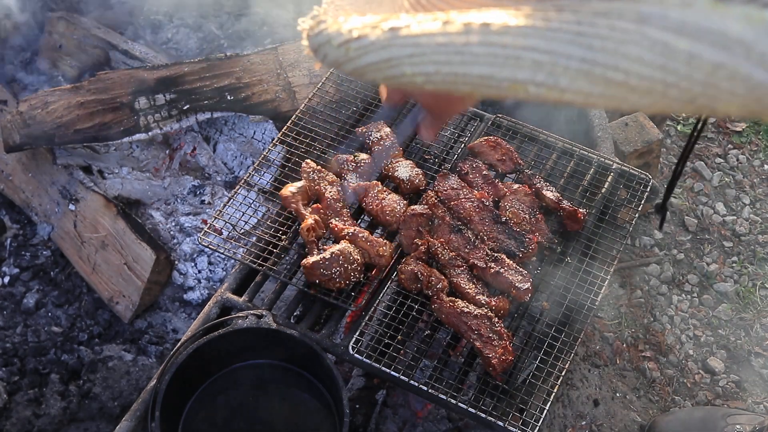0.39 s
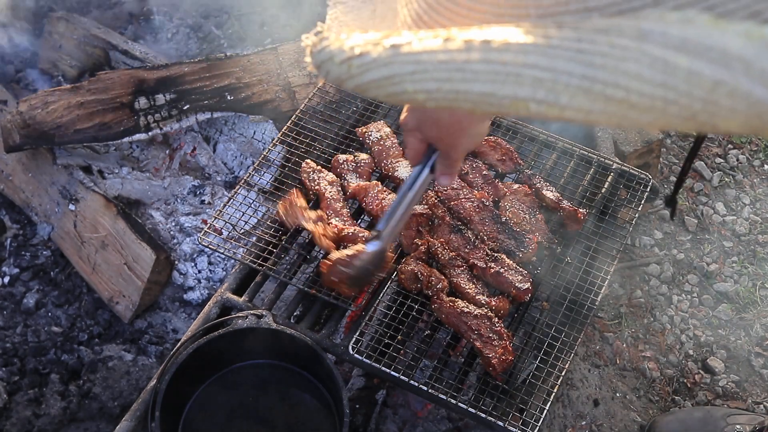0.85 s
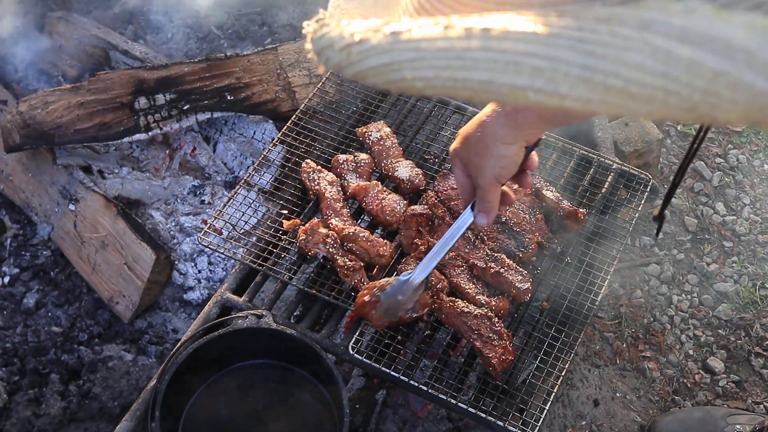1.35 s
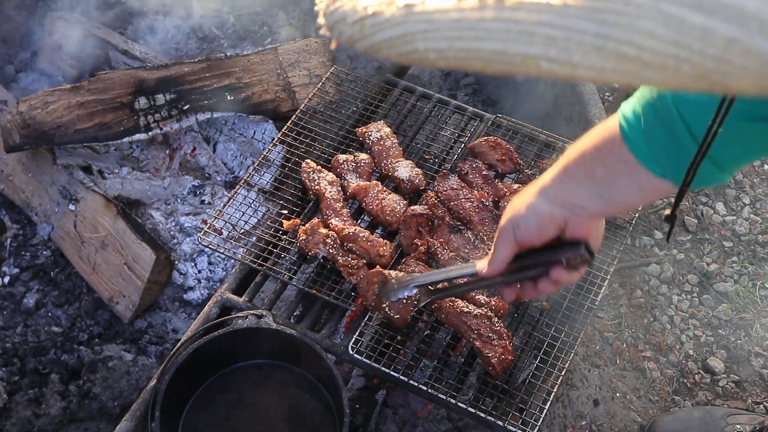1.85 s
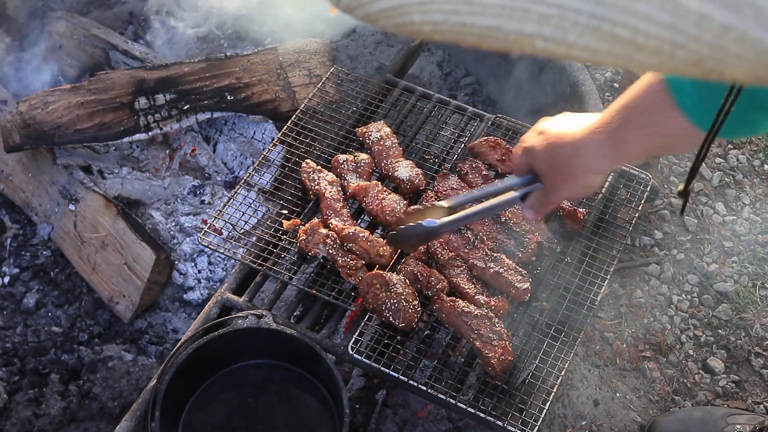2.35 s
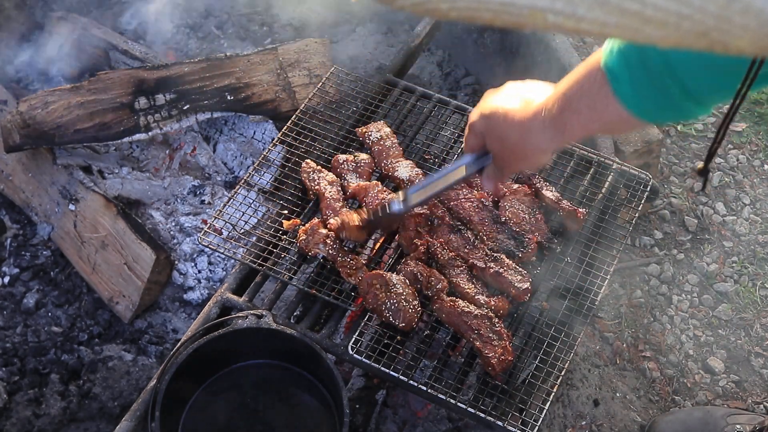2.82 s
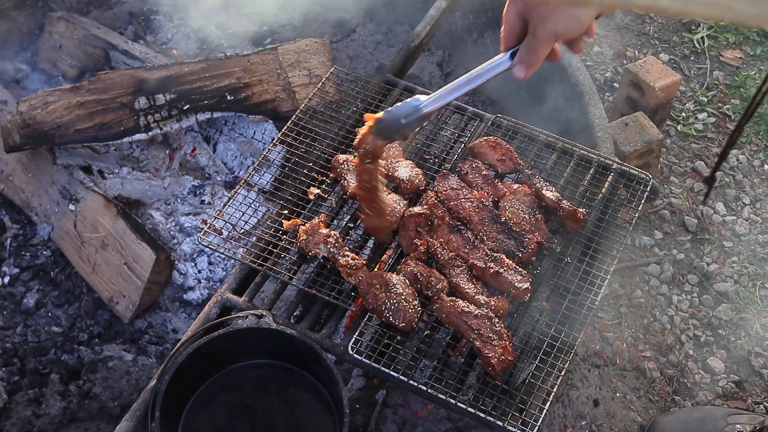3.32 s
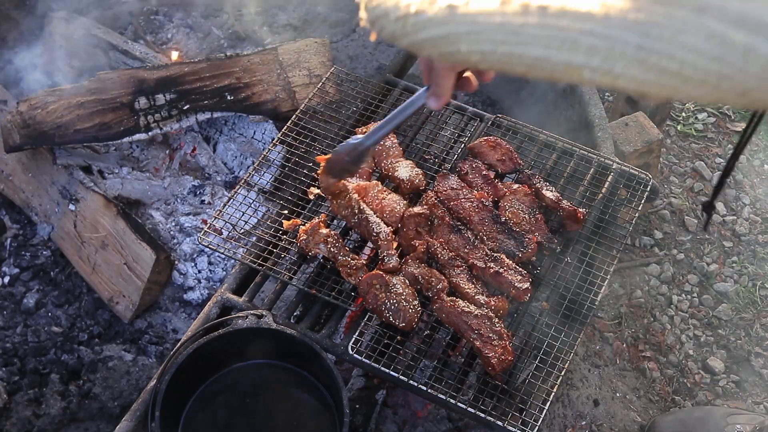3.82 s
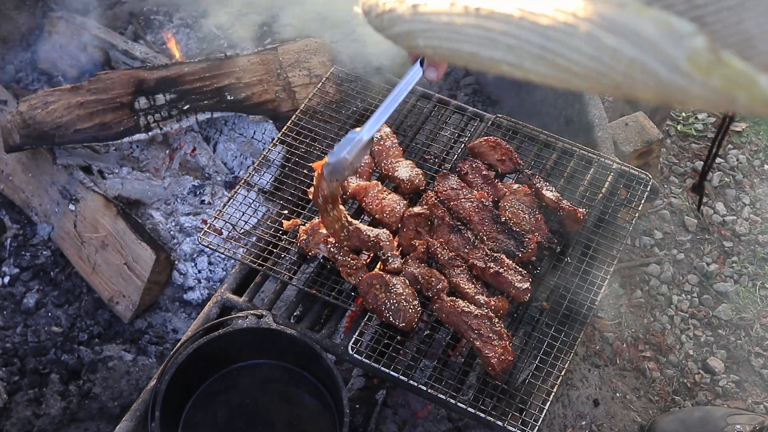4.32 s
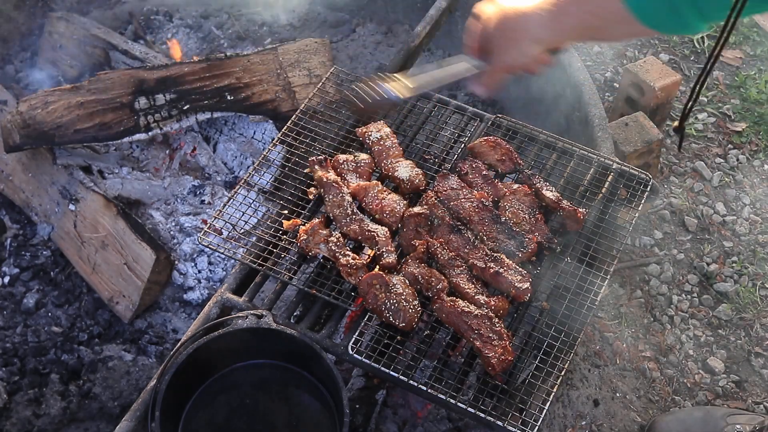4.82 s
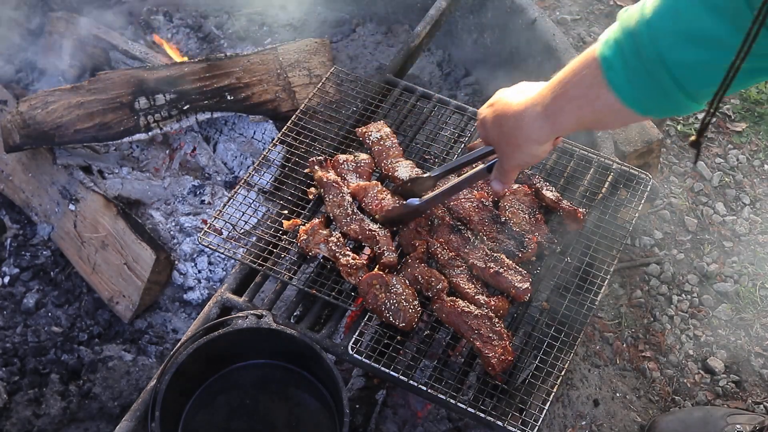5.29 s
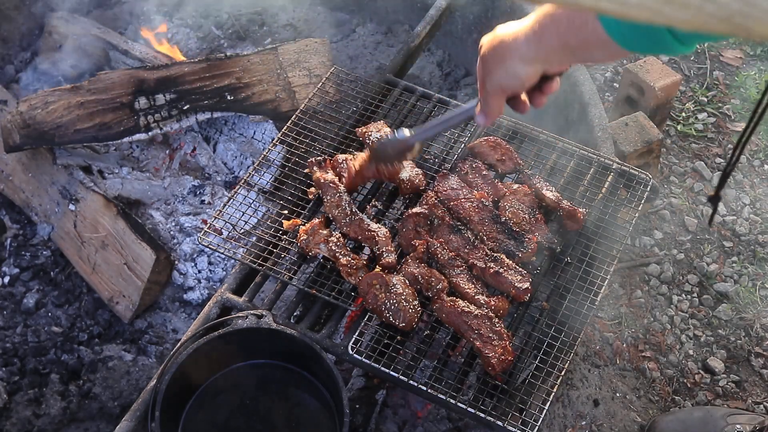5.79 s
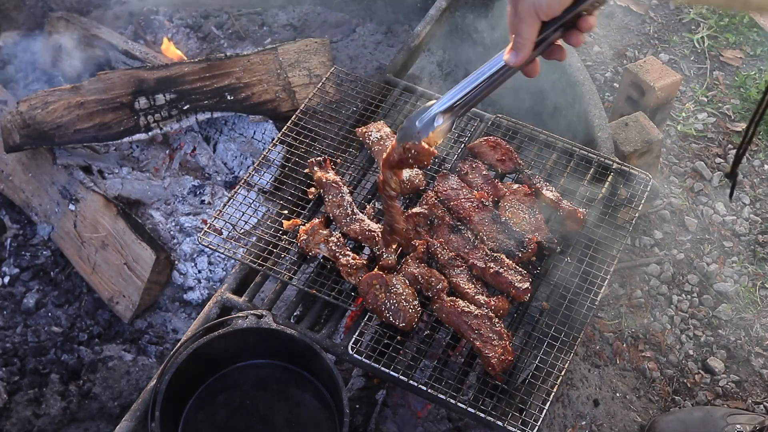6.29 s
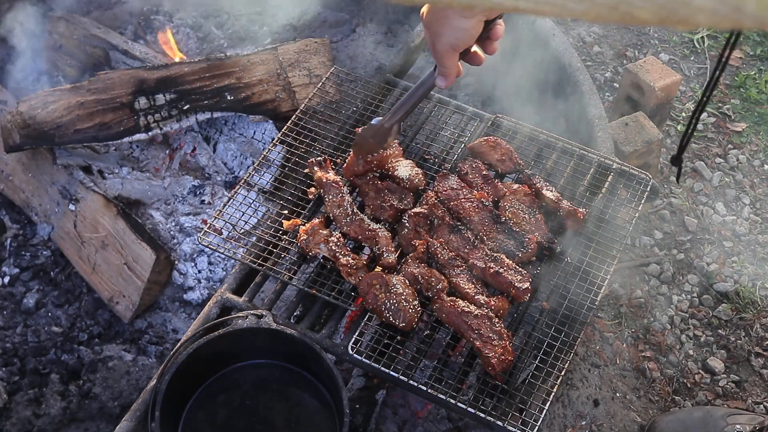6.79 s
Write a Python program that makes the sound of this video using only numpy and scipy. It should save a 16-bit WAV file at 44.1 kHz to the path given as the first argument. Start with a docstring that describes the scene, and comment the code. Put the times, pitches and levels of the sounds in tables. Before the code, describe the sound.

Meat sizzles steadily on wire racks over an outdoor wood fire, with fat spitting, metal tongs knocking and two loud log pops.

```python
"""Fat hisses and spits as meat sizzles on wire racks over an outdoor wood fire and tongs turn it.
Logs pop, the tongs knock the racks, a few steps thud, and a far road-like roar with two faint hums lies behind.
The sizzle, spits and sputters are shaped noise; the pops are decaying tones with splinter noise.
Knocks are roughened resonances, thuds and the squeak short tones, the roar smooth noise.
One small microphone stands close to the fire."""
import sys
import numpy as np
from scipy import signal
from scipy.fft import rfft, irfft
from scipy.io import wavfile
from scipy.ndimage import uniform_filter1d

SR = 44100
rng = np.random.default_rng(int(sys.argv[2]) if len(sys.argv) > 2 else 0)


def voltage_ratio(level):
    """Linear amplitude factor for a level in decibels (scalar or array-like)."""
    return 10 ** (np.asarray(level, float) / 20)


def wav_record(signal):
    """Record a signal, one row per channel, as 16-bit PCM in the file named by sys.argv[1]."""
    frames = np.transpose(np.atleast_2d(signal))
    bounded = np.clip(frames, -1, 1)
    # unit amplitude maps onto the largest positive 16-bit level
    quanta = np.round(bounded * 32767).astype(np.int16)
    wavfile.write(sys.argv[1], SR, quanta)


N = 315315


def evened(x):
    """Scales to rms 1."""
    return x / np.sqrt(np.mean(x ** 2) + 1e-20)


def read(points, hz):
    """Reads a spectrum on a log-frequency axis."""
    f, value = np.transpose(points)
    return np.interp(np.log(hz + 1), np.log(f + 1), value)


def add(mix, start_s, sound):
    """Mixes a sound in at a time."""
    part = mix[round(start_s * SR):][:len(sound)]
    part += sound[:len(part)]


def resonate(x, hz, width_hz):
    """A resonance of gain 1: shifts its pitch to zero, smooths, and shifts back."""
    turn = np.exp(2j * np.pi * hz * np.arange(len(x)) / SR)
    r = np.exp(-np.pi * width_hz / SR)
    return 2 * (turn * signal.lfilter([1 - r], [1, -r], x / turn)).real


def coloured(x, spectrum):
    """Gives a sound a spectrum, causally (minimum phase), so clicks stay sharp; evens it to rms 1."""
    level_db = np.maximum(read(spectrum, abs(np.fft.fftfreq(4096, 1 / SR))), -90)
    log_gain = np.log(voltage_ratio(level_db))
    taps = np.fft.ifft(np.exp(log_gain - 1j * signal.hilbert(log_gain).imag)).real[:2048]
    return evened(signal.oaconvolve(x, taps)[:N])


def patchy(patchy_db, flicker_db, size):
    """Noise with drifting patches and a flicker shared by all frequencies."""
    frames, bins = 4 * N // size + 8, size // 2 + 1
    a, b, patches = rng.standard_normal((frames, bins, 3)).T
    patches = uniform_filter1d(patches, size=10, axis=0)  # across frequency
    patches = evened(uniform_filter1d(patches, size=12, axis=1))  # across time
    flicker = evened(uniform_filter1d(rng.standard_normal(frames), size=4))
    z = (a + 1j * b) * voltage_ratio(patchy_db * patches + flicker_db * flicker)
    return evened(signal.istft(z, nperseg=size, noverlap=3 * size // 4)[1][:N])


def gush(start_s, length_s, rise_s):
    """Swells in, holds, and dies away with a time constant of 0.15 s."""
    t = np.arange(N) / SR - start_s
    return np.clip(t / rise_s, 0, 1) * np.exp(-np.maximum(t - length_s, 0) / 0.15)


def bell(hz, octaves):
    """A band that has fallen 6 dB at this many octaves from its centre."""
    return [(hz * 2 ** (k * octaves), -6 * k ** 2) for k in np.arange(-7, 8) / 2]


def bubble_puffs():
    """Bubbles of fat burst at random in runs, each a short puff of noise."""
    clumps = voltage_ratio(5.5 * evened(uniform_filter1d(rng.standard_normal(N), size=900)))
    chance, size, sign = rng.random(N), rng.exponential(1, N), rng.standard_normal(N)
    bursts_per_s = 160 * clumps
    clicks = (chance < bursts_per_s / SR) * voltage_ratio(2.0 * np.minimum(size, 3))
    return signal.lfilter([1], [1, -np.exp(-1 / (0.00015 * SR))], clicks) * sign


# how hard the fat fries as pieces are lifted, turned and laid down: (time_s, level_db)
FRY_LEVELS = [(0, -54.5), (.2, -53), (.45, -51.5), (.7, -50), (.95, -50), (1.2, -53), (1.52, -50),
              (1.68, -45), (1.85, -47.5), (2.25, -49.5), (2.5, -48), (2.8, -49.5), (2.95, -46.5),
              (3.45, -48), (4.1, -50), (4.6, -50), (4.85, -47.5), (5.2, -47), (5.8, -48), (6.2, -46),
              (7.15, -44)]


def fry_gain():
    """The strength of the frying over time; more heat on wet fat is a louder hiss."""
    return voltage_ratio(np.interp(np.arange(N) / SR, *np.transpose(FRY_LEVELS)))


# spectrum of the frying fat: (pitch_hz, level_db per Hz, relative)
FAT_SPECTRUM = [(880, -29), (1500, -1), (1900, -5.5), (2260, -1.5), (2980, -2), (4410, -3), (5400, -2.5),
                (6200, -6), (6800, -5.5), (7260, -6), (9100, -3.5), (13000, -8), (15600, -15.5)]


def frying(puffs):
    """Many small bursts merge into a dense hiss, with clumped spatter over it."""
    # drops are larger than the fizz, so they sound duller
    duller = [(hz, db - 1.26 * np.log2(hz / 4000)) for hz, db in FAT_SPECTRUM]
    fizz = coloured(patchy(1.4, 1.0, size=256), FAT_SPECTRUM)
    return fizz + voltage_ratio(-7.0) * coloured(puffs, duller)


# spectrum of thin steam jets: (pitch_hz, level_db per Hz, relative)
STEAM_SPECTRUM = [(3530, -15), (6000, 2.5), (8880, 3), (10800, 1.5), (12300, 9.5), (14800, 4.5),
                  (15600, 8.5)]
# steam jets open and close: (start_s, length_s, level_db)
STEAM_JETS = [(0.482, 0.33, -44.5), (1.523, .36, -43.5), (1.946, 0.23, -44.5), (2.33, .1, -60),
              (3.006, 0.21, -46)]
STEAM_SHARE_DB, JET_RISE_S = -6, 0.034  # steady steam against the frying level; opening time


def steam(puffs, frying_gain):
    """Thin jets of steam hiss high: a steady part and passing jets, summed as power."""
    jets = sum((voltage_ratio(db) * gush(s, length, JET_RISE_S)) ** 2 for s, length, db in STEAM_JETS)
    gain = np.sqrt((frying_gain * voltage_ratio(STEAM_SHARE_DB)) ** 2 + jets)
    hiss = patchy(1.8, 0.83, size=256) + voltage_ratio(-6) * evened(puffs)
    return gain * coloured(hiss, STEAM_SPECTRUM)


# juice runs onto hot metal: (start_s, length_s, level_db, centre_hz, width_octaves, rise_s)
JUICE_DRIPS = [(3.062, 0.15, -43, 3240, 1.7, 0.035), (6.352, .9, -51, 3740, 0.44, 0.47)]


def drips(puffs):
    """Juice on hot metal hisses in lower, strongly flickering bands."""
    bubbling = patchy(1.4, 3.9, size=256) + voltage_ratio(-13.5) * evened(puffs)
    out = np.zeros(N)
    for s, length, db, hz, octaves, rise in JUICE_DRIPS:
        out += voltage_ratio(db) * gush(s, length, rise) * coloured(bubbling, bell(hz, octaves))
    return out


def sizzle():
    """Bursting bubbles of fat are heard in the frying, the steam and the drips together."""
    puffs, gain = bubble_puffs(), fry_gain()
    return gain * frying(puffs) + steam(puffs, gain) + drips(puffs)


# fat spits and small cracks:
# (start_s, level_db per 8 kHz of band at the onset, brightness_db per octave, t60_s)
FAT_SPITS = [(.1129, -47.5, 11.5, .012), (.4358, -35, -1.5, 0.015), (.4787, -41.5, 1, 0.027),
             (.6505, -38, 1, 0.027), (.7959, -39, 7.5, 0.0091), (.8653, -38, 6, 0.01),
             (.9145, -38, 0, .006), (1.0226, -35.5, 1.5, 0.0058), (1.0842, -37.5, 1, .009),
             (1.3139, -35, -3, .016), (1.4081, -39, -2.5, .013), (1.5286, -42.5, 2, .011),
             (1.5965, -37.5, -5.5, .025), (1.718, -34, -1, 0.01), (1.869, -38, -3, .012),
             (1.903, -27, 0, .015), (1.9046, -25, -2, 0.026), (1.999, -43, 3, .01), (2.048, -37, -1, 0.013),
             (2.345, -39, 3.5, .012), (2.358, -36, 2, .01), (2.368, -40, -4.5, .012), (2.431, -39, 0, .01),
             (2.5922, -36.5, -1, .022), (2.6147, -38, -1, 0.01), (2.6448, -32.5, -2, 0.04),
             (2.6852, -41, 9.5, 0.025), (2.6888, -30.5, -5.5, 0.065), (2.9332, -37, 5, 0.016),
             (2.9416, -39, -5, .012), (3.0667, -30.5, -3.5, 0.013), (3.1109, -35.5, -6.5, 0.019),
             (3.1368, -44, -9, .012), (3.2865, -38, 7, 0.0089), (3.6955, -35.5, -6, .007),
             (4.0476, -42, 5, .012), (4.0708, -28.5, -6, 0.035), (4.4697, -36.5, 0.5, .012),
             (6.1818, -37, -3, 0.02)]
# lower, middle and upper points of a spit's spectrum [Hz]
SPIT_POINTS_HZ = (1300, 4900, 12500)
SPIT_BULGE_DB = 6  # how far the middle stands out


def spit(db, tilt_db, t60):
    """A tick and a sharp puff of noise, each spit with its own brightness."""
    t = np.arange(2048) / SR
    puff = rng.standard_normal(2048) * voltage_ratio(-60 * t / max(t60, .003))
    puff[0] = -7.5  # the skin of the bubble snaps
    low_hz, mid_hz, high_hz = SPIT_POINTS_HZ
    low_db = db - SPIT_BULGE_DB + tilt_db * np.log2(low_hz / mid_hz)
    high_db = db - SPIT_BULGE_DB + tilt_db * np.log2(high_hz / mid_hz)
    colour = [(low_hz / 4, low_db - 2), (low_hz, low_db), (mid_hz, db),
              (high_hz, high_db), (SR / 2, high_db - 14)]
    size = voltage_ratio(read(colour, abs(np.fft.fftfreq(2048, 1 / SR))))
    size *= np.sqrt(SR / 2 / 8000)  # level per 8 kHz to full-band level
    causal = size * np.exp(-1j * signal.hilbert(np.log(size)).imag)
    return np.fft.ifft(np.fft.fft(puff) * causal).real


# wet sputters without a snap: (start_s, level_db rms while held, centre_hz, width_octaves, length_s)
WET_SPUTTERS = [(.14, -48.5, 3270, 1, 0.043), (.9148, -40.5, 1840, 0.27, 0.0018),
                (2.1225, -41, 4470, 0.98, 0.005), (2.130, -34, 5500, 1, 0.0018),
                (2.1345, -33.5, 4150, 0.75, 0.0043), (2.689, -31.5, 7850, 0.28, .004),
                (3.6956, -36, 13500, 0.46, .001), (4.572, -38.5, 7900, 0.63, 0.005),
                (6.0296, -31.5, 11500, 1, 0.0019)]
SPUTTER_T60_S = 0.0087


def sputter(db, hz, octaves, length):
    """A wet burst of noise in one band, held briefly."""
    t = np.arange(2048) / SR
    gain = voltage_ratio(read(bell(hz, octaves), np.fft.rfftfreq(2048, 1 / SR)))
    band = evened(irfft(rfft(rng.standard_normal(2048)) * gain))
    return voltage_ratio(db - 60 * np.maximum(t - length, 0) / SPUTTER_T60_S) * band


# logs pop: (start_s, ring peak level_db, brightness_db per octave, splinter_db against the ring peak)
LOG_POPS = [(2.6214, -5.5, 7, -23), (4.0706, 5, 7, -49)]
# ringing modes of a log, before the brightness tilt: (pitch_hz, level_db, t60_s)
LOG_MODES = [(133, -16, 0.22), (178, 10.5, 0.083), (245, 4.5, 0.042), (340, 14, 0.038), (519, 20.5, 0.0064),
             (744, 6.5, 0.0093), (933, 10, 0.017), (1065, -23, 0.08), (1586, -15, 0.037),
             (1750, -19, 0.032), (1790, -54, 0.051), (2590, -5.5, 0.0074), (3400, -7, 0.0043),
             (5040, -7, 0.0064)]


def pop(db, tilt_db, splinter_db):
    """A pocket of gas bursts: a suck of pressure rings the log, then bounces dully off the ground."""
    t = np.arange(6000) / SR
    ring = np.zeros(len(t))
    for hz, level, t60 in LOG_MODES:
        mode_db = level + tilt_db * np.log2(hz / 1000) - 60 * t / t60
        ring += voltage_ratio(mode_db) * np.cos(2 * np.pi * hz * t)
    ring = -np.convolve(ring, np.hanning(9))[:len(t)]  # softened onset, sign turned over
    # a small burst moves little deep bass
    ring = signal.lfilter(*signal.butter(2, 70, "high", fs=SR), ring)
    ring /= abs(ring).max()
    echo = np.zeros(len(t))
    add(echo, .0063, -.2 * uniform_filter1d(ring, size=24, mode="constant", origin=11))
    splinters = voltage_ratio(splinter_db - 60 * t / 0.041) * rng.standard_normal(len(t))
    return voltage_ratio(db) * (ring + echo + splinters)


# tongs knock or drag a rack: (start_s, level_db rms during contact, rattle length_s, t60_s, pitch_factor)
TONG_KNOCKS = [(.649, -28.5, 0.03, 0.05, 1.035), (.686, -31.5, 0.011, 0.1, 0.83),
               (.7, -35.5, .012, 0.12, 1.1), (.71, -40.5, 0.018, 0.23, 0.46),
               (1.605, -42, 0.036, 0.15, 0.56), (1.902, -30, 0.0031, .03, 2.43),
               (1.91, -34.5, 0.011, 0.21, .56), (2.63, -36, 0.063, 0.48, .55),
               (2.692, -29.5, 0.014, 0.06, 0.91), (2.705, -35, 0.014, 0.24, 0.493),
               (2.785, -35, 0.011, 0.083, 0.587), (4.59, -31.5, 0.005, 0.042, 0.36),
               (4.655, -54, 0.0087, 0.07, 0.32)]
# rack wire modes at pitch factor 1: (pitch_hz, level_db, width_hz of each of two resonance passes)
RACK_MODES = [(220, -4.5, 170), (303, -5.5, 38), (427.4, 4, 50), (657, -1.5, 180), (867, -3.5, 140),
              (952, -9.5, 130), (2100, -13.5, 1600)]


def knock(db, length, t60, pitch):
    """A short rattle of contacts keeps the rack's wires ringing: steady tones roughened by noise."""
    t = np.arange(SR // 3) / SR
    drive, phase = rng.standard_normal(len(t)), 2 * np.pi * rng.random()
    rings = np.zeros(len(t))
    for hz, level, width_hz in RACK_MODES:
        mode_hz, mode_width_hz = hz * pitch, width_hz * pitch
        once = resonate(drive, mode_hz, mode_width_hz)
        rough = evened(resonate(once, mode_hz, mode_width_hz))
        # narrow modes of short, tight wires hold their tone
        steady = 100 * pitch / width_hz * np.sin(2 * np.pi * mode_hz * t + phase)
        rings += voltage_ratio(level) * evened(rough + steady)
    shape = np.minimum(t / 0.0034, 1) * voltage_ratio(-60 * np.maximum(t - length, 0) / t60)
    return voltage_ratio(db) * evened(rings) * shape


# metal slips on wire: (start_s, peak level_db, start_hz, end_hz, length_s)
WIRE_SQUEAKS = [(.698, -43, 2500, 2750, .022)]


def squeak(db, start_hz, end_hz, length):
    """Metal slipping on wire gives a tiny rising whistle."""
    hz = np.linspace(start_hz, end_hz, round(length * SR))
    return voltage_ratio(db) * np.sin(2 * np.pi * np.cumsum(hz) / SR) * np.hanning(len(hz))


# footfalls on earth, before the microphone: (start_s, peak level_db, pitch_hz, length_s)
FOOT_THUDS = [(.72, -43, 51, 0.22), (1.36, -43, 53, 0.15), (1.95, -39, 53, .15), (2.7, -40, 54.4, 0.17)]


def thud(db, hz, length):
    """The ground swings briefly at one low pitch."""
    t = np.arange(round(length * SR)) / SR
    return voltage_ratio(db) * np.sin(2 * np.pi * hz * t) * np.sin(np.pi * t / length) ** 2


# spectrum of the distant roar: (pitch_hz, level_db per Hz, relative)
ROAR_SPECTRUM = [(20, -30), (45, -5), (65, -3), (90, 0.5), (130, -3.5), (180, -5), (278, -6.5), (405, -12),
                 (543, -8), (598, -4), (929, -4), (1420, -14.5), (1750, -25.5), (2200, -30), (2860, -32)]
ROAR_MIDWAY_DB, ROAR_RISE_DB_PER_S = -42, 0.26  # rms level halfway through, and its climb


def roar():
    """Far-off, smooth noise that slowly nears by growing louder."""
    swell = voltage_ratio(ROAR_MIDWAY_DB + ROAR_RISE_DB_PER_S * (np.arange(N) - N / 2) / SR)
    return swell * coloured(patchy(0.57, 0.5, size=2048), ROAR_SPECTRUM)


# faint distant hums: (pitch_hz, level_db rms, width_hz of the wavering part)
FAINT_HUMS = [(156, -54, 3), (202, -59, 3)]


def hums():
    """Steady tones made to waver by narrow noise at the same pitch."""
    out = np.zeros(N)
    for hz, db, width_hz in FAINT_HUMS:
        steady = np.sqrt(2) * np.sin(2 * np.pi * hz * np.arange(N) / SR)
        waver = evened(resonate(rng.standard_normal(N), hz, width_hz))
        out += voltage_ratio(db) * evened(1.94 * steady + waver)
    return out


def scene():
    """The fire and racks close by in the open air, the roar and hums far behind."""
    mix = sizzle() + roar() + hums()
    events = ((FAT_SPITS, spit), (WET_SPUTTERS, sputter), (LOG_POPS, pop),
              (TONG_KNOCKS, knock), (WIRE_SQUEAKS, squeak), (FOOT_THUDS, thud))
    for table, source in events:
        for start_s, *row in table:
            add(mix, start_s, source(*row))
    return mix[None]


def roll_off(x):
    """The treble ends steeply here."""
    return signal.sosfilt(signal.butter(12, 16660, fs=SR, output="sos"), x)


# microphone housing resonances, added to the direct sound: (pitch_hz, level_db, width_hz)
HOUSING_MODES = [(2150, -5, 250), (4600, -1.5, 280), (7200, -6, 300)]


def record(dry):
    """One small microphone: housing resonances and bass roll-off; then a low-pass at 15.8 kHz and clipping."""
    direct = dry[0]
    x = direct + sum(voltage_ratio(db) * resonate(direct, hz, width_hz) for hz, db, width_hz in HOUSING_MODES)
    x = signal.sosfilt(signal.butter(2, 38, "high", fs=SR, output="sos"), x)
    lowpass = signal.firwin(1023, 15780, window=("kaiser", 7), fs=SR)
    x = signal.oaconvolve(x, lowpass, "same")
    finished = np.clip(x, -1, 1)[None]
    return roll_off(finished)


dry = scene()
out = record(dry)
wav_record(out)
```